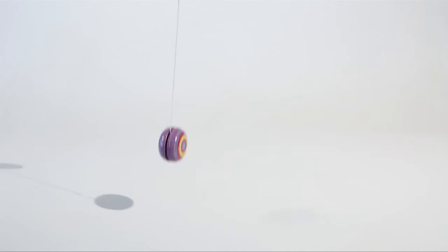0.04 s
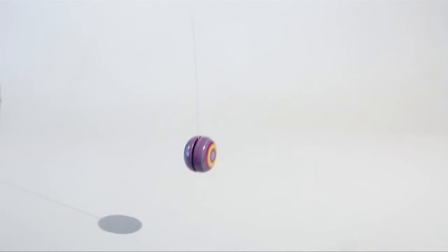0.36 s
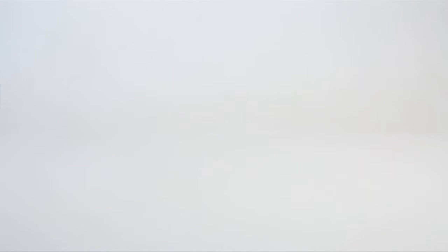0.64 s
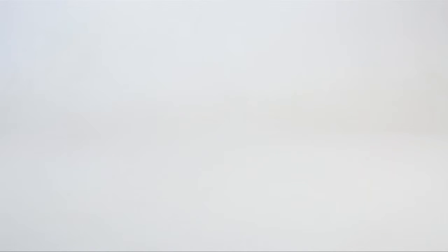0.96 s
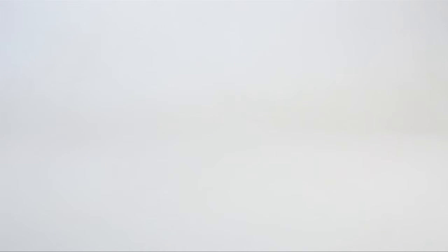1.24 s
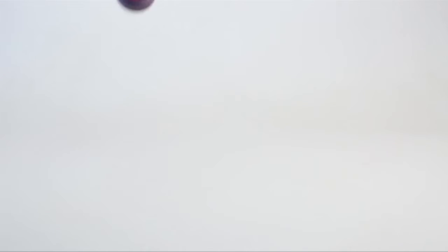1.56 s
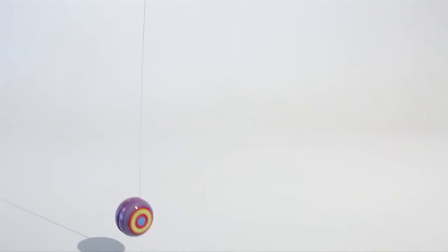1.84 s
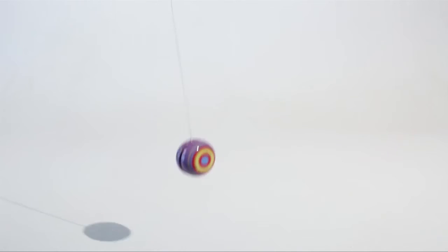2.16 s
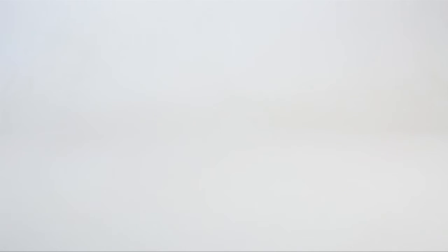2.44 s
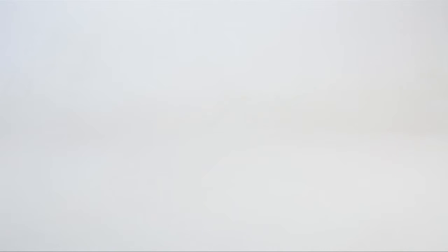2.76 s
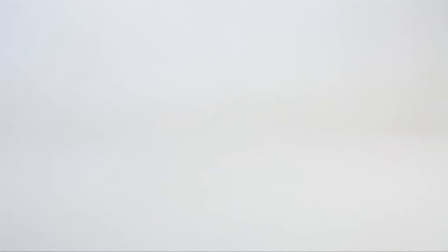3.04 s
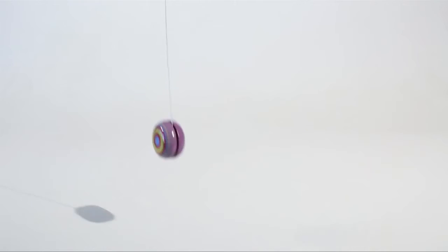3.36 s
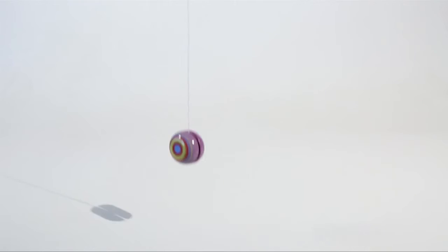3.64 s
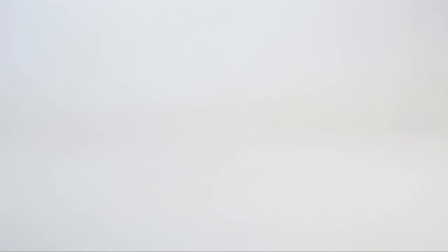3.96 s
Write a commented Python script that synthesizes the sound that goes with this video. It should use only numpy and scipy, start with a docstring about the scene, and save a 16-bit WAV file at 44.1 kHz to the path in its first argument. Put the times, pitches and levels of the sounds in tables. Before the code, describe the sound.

A plastic yo-yo whirs faintly on its string, with short rubs and soft thumps.

```python
"""A small plastic yo-yo runs down and up its string in a quiet room, heard in mono.
The string whirrs against the spinning shell and chafes on it in short rubs: its fibres slip
in many tiny jerks, which hiss and make the shell ring. Soft thumps come as the string is
tugged, and there is one sharper clack. Near the end the sound drops out for a moment and
returns on a hollow, ringing boom."""
import sys
import numpy as np
from scipy import signal
from scipy.fft import rfft, irfft
from scipy.io import wavfile

SR = 44100
rng = np.random.default_rng(int(sys.argv[2]) if len(sys.argv) > 2 else 0)


def generate_wav(signal):
    """Clip the signal to [-1, 1] and save it as 16-bit WAV at the path in sys.argv[1]."""
    frames = np.transpose(np.atleast_2d(signal))
    scaled = np.clip(frames, -1, 1) * 32767
    pcm = np.round(scaled).astype(np.int16)
    wavfile.write(sys.argv[1], SR, pcm)


N = 176400
TIME = np.arange(N) / SR
ATTACK_S, RELEASE_S = 0.00058, 0.0011  # how fast a touch starts and fades
SILENCE_FROM_S, SILENCE_TO_S = 3.75, 3.8295

# A mode is a pitch at which something likes to ring; the wider it is, the less clear its note.
# Each row of these four tables: pitch in Hz, width in Hz, relative level in dB.
SHELL_LOW_MODES = [(1310, 250, 0), (1640, 130, 2), (1900, 130, 1.5), (2290, 110, -4)]  # the plastic shell's lower ring
SHELL_HIGH_MODES = [(3420, 130, -3.5), (3920, 130, 5), (4620, 200, -3)]  # its higher ring
SPIN_MODES = [(1215, 84, -1), (2455, 63, 0)]  # the notes it sings as it spins
HISS_BANDS = [(4960, 880, -1), (6530, 660, 0.5), (7700, 600, -3), (9230, 790, -4.5), (11200, 2000, -11),
              (14500, 1100, -14.5)]  # the broad hiss of the string's fibres


def from_db(db):
    """Turn decibels into a number to multiply a sound by."""
    return 10 ** (np.asarray(db) / 20)


def rms_one(x):
    """Scale a sound to an average power of one."""
    return x / np.sqrt(np.mean(x ** 2) + 1e-20)


def shaped_noise(spectrum):
    """Steady noise of power one, its tone set by rows of pitch in Hz and relative level in dB."""
    hz, db = np.transpose(spectrum)
    bin_hz = np.maximum(np.fft.rfftfreq(N, 1 / SR), 1)
    gains = from_db(np.interp(np.log(bin_hz), np.log(hz), db))
    return rms_one(irfft(rfft(rng.standard_normal(N)) * gains, N))


def cut(x, kind, hz, order):
    """Keep only the "low" or the "high" side of a pitch; a higher order cuts more steeply."""
    return signal.sosfilt(signal.butter(order, hz, kind, fs=SR, output="sos"), x)


def resonate(x, modes):
    """Let a sound ring a set of modes, scaled so that white noise would keep its power."""
    def ring(drive):
        total = 0
        for k, (hz, width, db) in enumerate(modes):
            decay = np.exp(-np.pi * width / SR)
            feedback = [1, -2 * decay * np.cos(2 * np.pi * hz / SR), decay ** 2]
            gain = (-1) ** k * from_db(db) * (1 - decay ** 2)
            total = total + gain * signal.lfilter([1, 0, -1], feedback, drive)
        return total
    floor = 1e-18 * rng.standard_normal(len(x))  # too faint to hear; keeps the filters fast
    return ring(x + floor) / np.linalg.norm(ring(signal.unit_impulse(SR // 10)))


def dying(start, fade_s):
    """A level that jumps to one, then falls by 60 dB in fade_s seconds."""
    return (TIME >= start) * np.exp(-np.log(1000) * np.maximum(TIME - start, 0) / fade_s)


def burst(start, length, attack=ATTACK_S, release=RELEASE_S):
    """A level that rises, holds and fades; all times are in seconds."""
    rise = np.clip((TIME - start) / attack + .5, 0, 1)
    fall = np.exp(-np.clip((TIME - start - length) / release, 0, 20))
    return rise * fall


def wandering(curve, flutter_db, points_per_s=60):
    """A level that follows a curve and flutters quickly at random around it."""
    flutter = np.interp(TIME * points_per_s, np.arange(N), rng.standard_normal(N))
    return from_db(np.interp(TIME, *np.transpose(curve)) + flutter_db * flutter)


def struck(start, tones):
    """The fading tones of something hit once, for half a second at most."""
    first = int(start * SR)
    t = TIME[:min(SR // 2, N - first)]
    sound = np.zeros(N)
    for hz, db, fade_s in tones:
        level = from_db(db) * np.exp(-np.log(1000) * t / fade_s)
        sound[first:first + len(t)] += level * np.sin(2 * np.pi * hz * t)
    return sound


def with_echo(x, db, fade_s):
    """Add the room's short, blurred echo."""
    tail = dying(0, fade_s) * rng.standard_normal(N) * (TIME > .004)
    return x + from_db(db) * signal.fftconvolve(x, tail / np.linalg.norm(tail))[:N]


def slips(size=N, per_s=6000, spread_db=4):
    """The fibres slip in a dense stream of tiny, uneven clicks, with an average power of one."""
    strengths = from_db(spread_db * np.minimum(rng.exponential(1, size), 4))
    signs = rng.choice([-1, 1], size)
    return rms_one(strengths * signs * (rng.random(size) < per_s / SR))


def varied(modes, detune=.012, spread_db=1.8):
    """Each touch shifts the modes' pitches and levels a little, at random."""
    return [(hz * (1 + detune * rng.uniform(-1.13, 1)), width, db + spread_db * rng.standard_normal())
            for hz, width, db in modes]


def touch(start, length, groups):
    """The string slips and catches once, ringing each group: a level in dB and its modes."""
    first, size = int((start - ATTACK_S) * SR), SR // 20
    force = burst(ATTACK_S, length)[:size]
    catch_at = int((ATTACK_S + rng.uniform(0, 0.46) * length) * SR)
    catch = np.sqrt(0.00098 * SR) * signal.unit_impulse(size, catch_at)  # energy of about 1 ms of rubbing
    sound = np.zeros(N)
    for db, modes in groups:
        sound[first:first + size] += from_db(db) * resonate(force * slips(size) + catch, modes)
    return sound


def room_tone():
    """The quiet room: an even hiss with two faint whines."""
    # The tone of the hiss. Each row: pitch in Hz, relative level in dB.
    spectrum = [(20, -30), (60, -2), (110, -4.5), (260, 5), (420, -3), (1300, -2), (2200, -4), (4000, -7),
                (15500, -17.5)]
    # The whines. Each row: pitch in Hz, width in Hz, relative level in dB.
    whines = [(1620, 40, 1), (3438, 50, 0)]
    hiss = from_db(-55.5) * shaped_noise(spectrum)
    return hiss + from_db(-64) * resonate(rng.standard_normal(N), whines)


def boom():
    """A hollow boom ends the silence: low tones ring in a fading wash of noise, with two bright ticks."""
    # The clear tones. Each row: pitch in Hz, level in dB, seconds to fade by 60 dB.
    tones = [(180.3, -37, 2.7), (272.3, -46, .8), (397, -43.5, 0.48), (441, -49, .7), (912, -52.5, 1.1),
             (1003, -50.5, .6)]
    # The tone of the wash. Each row: pitch in Hz, relative level in dB.
    spectrum = [(60, -22), (180, 1.5), (390, 2), (520, -12.5), (880, -8), (1800, -9), (4000, -27.5),
                (15000, -48)]
    # The ticks. Each row: start in seconds, length in seconds, level in dB.
    ticks = [(3.848, 0.0059, -49), (3.879, .012, -54)]
    wash = from_db(-37.5) * dying(SILENCE_TO_S, fade_s=0.85) * shaped_noise(spectrum)
    tick_level = sum(from_db(db) * burst(start, length) for start, length, db in ticks)
    return struck(SILENCE_TO_S, tones) + wash + resonate(tick_level * slips(), HISS_BANDS)


def clack(start=1.6935):
    """One brief, hard knock that dies away in the room."""
    # The ring of the knock. Each row: pitch in Hz, width in Hz, relative level in dB.
    modes = [(683, 55, 9), (934, 150, 2.5), (1570, 570, 1), (2460, 93, 4.5), (7240, 2500, -16)]
    force = burst(start, length=0.0038, release=.003)
    tail = from_db(-6) * dying(start, fade_s=0.46)
    return from_db(-39.5) * resonate(np.hypot(force, tail) * rng.standard_normal(N), modes)


def thumps():
    """Tugs on the string thump a small body, each with its own loudness and brightness."""
    # The blows. Each row: start in seconds, level in dB, treble cut-off in Hz,
    # relative level in dB of one extra tone that depends on where the blow lands.
    blows = [(.0525, -38.5, 2400, -8), (0.07, -44, 2600, -7), (.092, -38.5, 560, -4),
             (0.1527, -38.5, 1200, -12), (.632, -42, 905, 2), (2.256, -37.5, 716, 4),
             (3.2585, -44, 450, -3.5), (3.469, -44.5, 400, -2)]
    # The body's tones. Each row: pitch in Hz, relative level in dB, seconds to fade by 60 dB.
    tones = [(284, -2.5, .12), (735, 1.5, .034), (846, -2, 0.017), (2720, 0.32, 0.018)]
    body = 0
    for start, db, cutoff_hz, extra_db in blows:
        ring = struck(start, tones + [(422, extra_db, 0.04)])
        body = body + from_db(db) * cut(ring + 1e-18, "low", cutoff_hz, order=2)
    return with_echo(cut(body, "high", hz=187, order=4), db=-10.5, fade_s=0.25)


def rasp(start=0.802, length=0.13, hz=7900):
    """A high, grainy scrape under a quick run of rubs."""
    force = burst(start, length, attack=length / 2, release=length / 10)
    return from_db(-62.5) * resonate(force * slips(), [(hz, hz / 10, 0)])


def grazes(length=.006, width_hz=190):
    """Light grazes of the string tick or squeak on one note, over a softer ring and hiss."""
    # The grazes. Each row: start in seconds, level in dB, pitch in Hz.
    events = [(.341,-51.5,4550), (.408,-51,4500), (.504,-50.5,4580), (.67,-54,7450), (0.697,-50.5,2440),
              (.728,-53,3950), (1.982,-58,5850), (2.009,-51,2460), (2.189,-48,4500), (2.391,-53,2460),
              (2.78,-47.5,3830), (2.866,-46.5,4670), (3.108,-47.5,4460)]
    sound = 0
    for start, db, hz in events:
        note = (db, [(hz, width_hz, 0)])
        ring_and_hiss = (db - 7, varied(SHELL_HIGH_MODES + HISS_BANDS))
        sound = sound + touch(start, length, [note, ring_and_hiss])
    return sound


def rubs():
    """The string chafes on the shell in short rubs, each with its own mix of ring and hiss."""
    # The rubs. Each row: start and length in seconds, then levels in dB of low ring, high ring and hiss.
    events = [(0.435,0.007,-46.5,-60,-60), (.539,0.008,-56,-53.5,-53.5), (0.7523,.005,-52,-54,-50.5),
              (0.8097,0.0047,-43.5,-63,-49), (0.837,0.0046,-45.5,-55,-48.5), (0.871,0.0062,-51.5,-56,-49.5),
              (0.902,0.0061,-49,-55,-54), (0.972,0.0092,-53,-58,-54), (1.042,.015,-54,-50.5,-56.5),
              (1.078,.017,-50.5,-51.5,-53.5), (1.125,.012,-51.5,-52,-53), (1.172,0.014,-61,-51,-53.5),
              (1.223,.013,-56,-50.5,-58), (1.243,0.0041,-50,-47,-48), (1.276,.016,-53.5,-54,-61),
              (1.3528,0.0041,-45.5,-40,-54.5), (2.05,.007,-64,-61,-54), (2.598,0.011,-55.5,-55,-50.5),
              (2.63,0.0077,-53,-55,-54), (2.745,.0093,-47.5,-47.5,-52), (2.816,0.0099,-59,-49,-51.5),
              (2.9,.011,-55,-55,-59), (3.176,0.013,-56.5,-53.5,-61), (3.583,0.009,-56.5,-61,-55.5)]
    sound = 0
    for start, length, low_db, high_db, hiss_db in events:
        groups = [(low_db - 2.5, varied(SPIN_MODES, detune=0)),
                  (low_db, varied(SHELL_LOW_MODES)),
                  (high_db, varied(SHELL_HIGH_MODES)),
                  (hiss_db, varied(HISS_BANDS, detune=.024))]
        sound = sound + touch(start, length, groups)
    return sound


def whirring(flutter_db=1.74, throb_db=4):
    """Steady rubbing makes the shell ring and the fibres hiss; each spin note throbs on its own."""
    # How strongly the string rubs. Each row: time in seconds, level in dB.
    friction_curve = [(.3, -69), (.44, -52.5), (.63, -58.5), (.87, -56.5), (1.17, -54.5), (1.42, -55),
                      (1.55, -67), (1.8, -66.5), (2.15, -60.5), (2.35, -66), (2.68, -59), (2.88, -56.5),
                      (3.0, -67.5), (3.42, -68), (3.62, -58.5)]
    # How strongly the spinning shell sings. Each row: time in seconds, level in dB.
    spin_curve = [(.3, -63.5), (1.4, -57.5), (1.6, -68.5), (2.02, -58.5), (2.3, -57.5), (2.5, -65.5),
                  (2.78, -57.5), (3.0, -64.5), (3.45, -70), (3.7, -59.5)]
    friction = wandering(friction_curve, flutter_db)
    singing = sum(from_db(db) * wandering(spin_curve, throb_db) * resonate(slips(), [(hz, width, 0)])
                  for hz, width, db in SPIN_MODES) / np.sqrt(2)
    hiss_level = from_db(-8) * np.hypot(friction, wandering(spin_curve, flutter_db))
    low_ring = resonate(friction * slips(), SHELL_LOW_MODES)
    high_ring = from_db(-4.5) * resonate(friction * slips(), SHELL_HIGH_MODES)
    hiss = resonate(hiss_level * slips(), HISS_BANDS)
    return singing + low_ring + high_ring + hiss


def string_on_shell():
    """The string whirrs, rubs, grazes and scrapes on the shell, and the room echoes it."""
    shell = cut(whirring() + rubs(), "high", hz=1150, order=8)
    return with_echo(shell + grazes() + rasp(), db=-11.5, fade_s=0.082)


def scene():
    """All the sources together, the same in both ears."""
    return np.tile(string_on_shell() + thumps() + clack() + boom() + room_tone(), (2, 1))


def record(dry, cutoff_hz=15900):
    """The sound drops out briefly, and the highest treble is cut away."""
    sound_on = (TIME < SILENCE_FROM_S) | (TIME > SILENCE_TO_S)
    treble_cut = signal.ellip(12, .1, 70, cutoff_hz, fs=SR, output="sos")
    return signal.sosfilt(treble_cut, dry * sound_on)


dry = scene()
out = record(dry)
generate_wav(out)
```